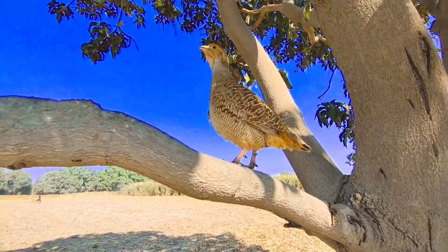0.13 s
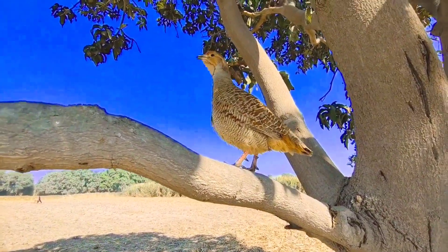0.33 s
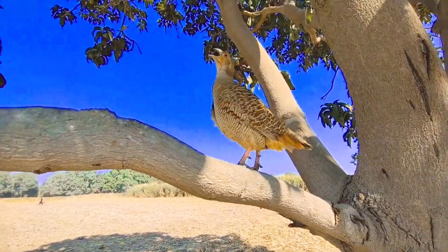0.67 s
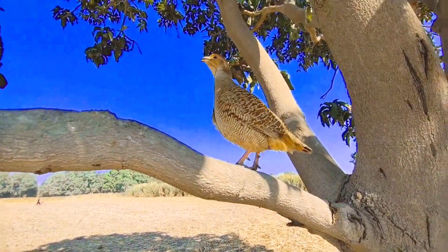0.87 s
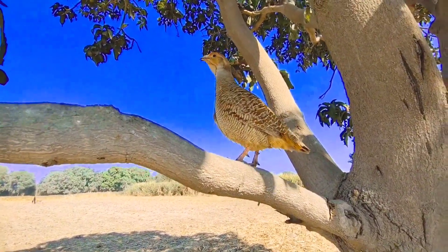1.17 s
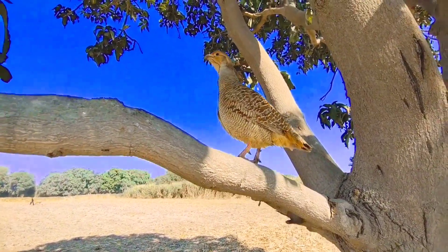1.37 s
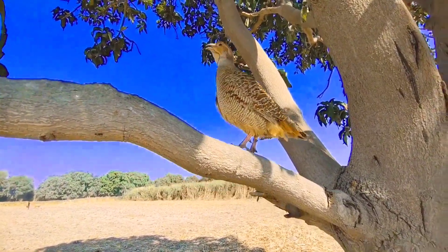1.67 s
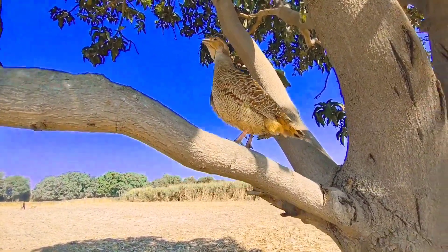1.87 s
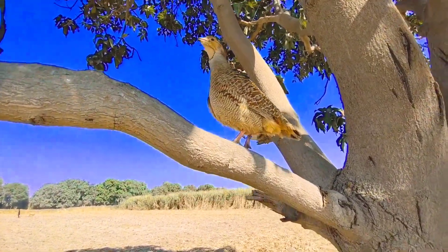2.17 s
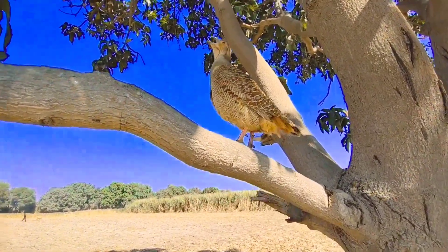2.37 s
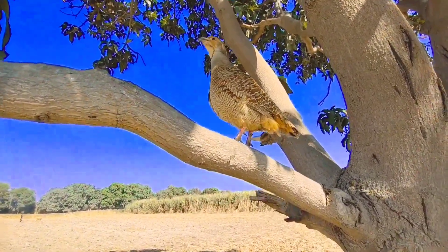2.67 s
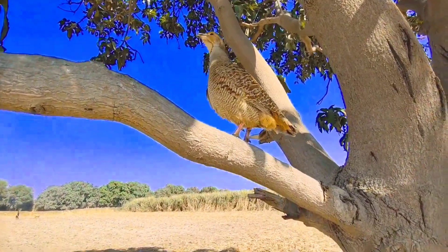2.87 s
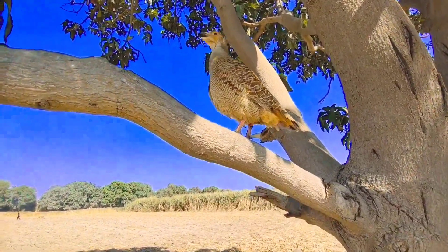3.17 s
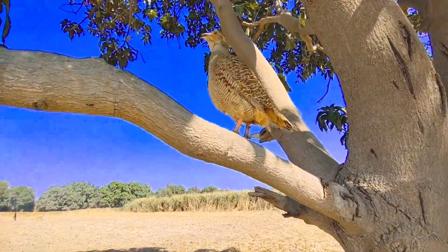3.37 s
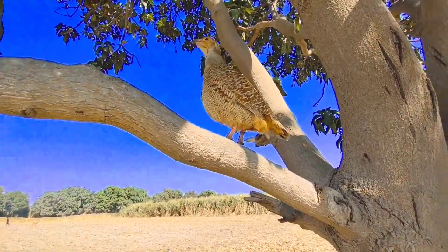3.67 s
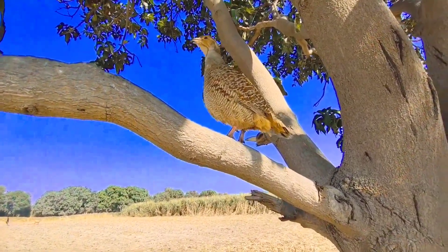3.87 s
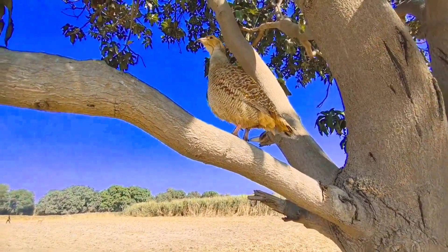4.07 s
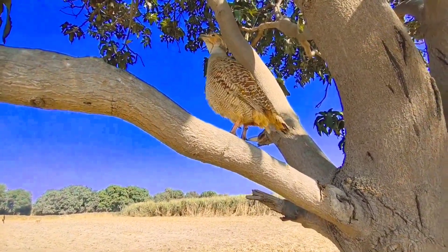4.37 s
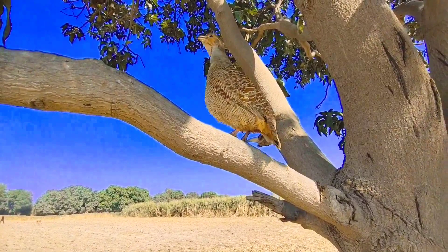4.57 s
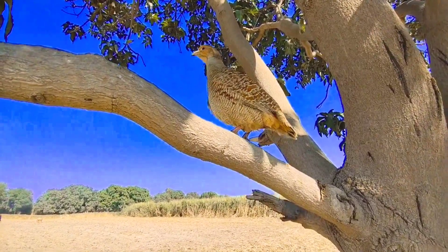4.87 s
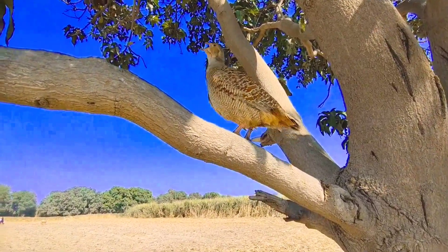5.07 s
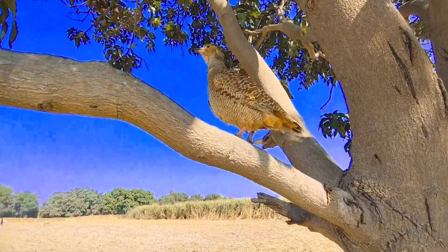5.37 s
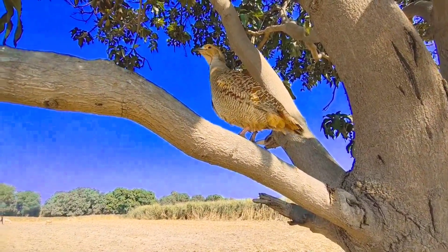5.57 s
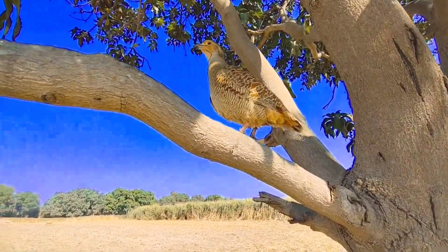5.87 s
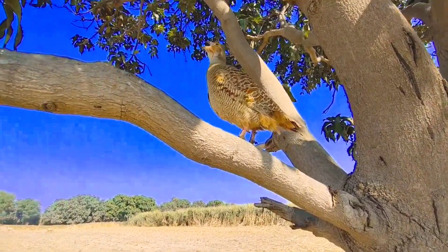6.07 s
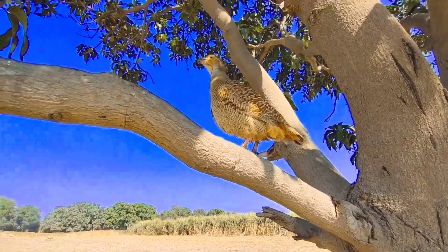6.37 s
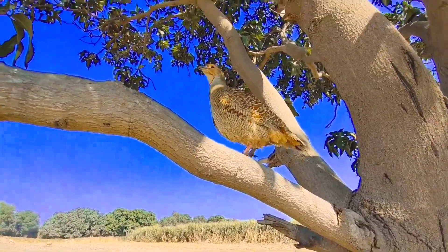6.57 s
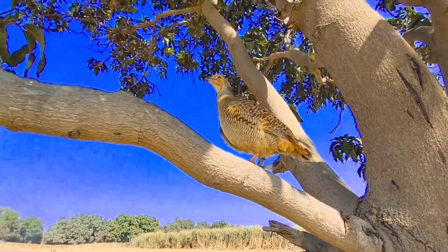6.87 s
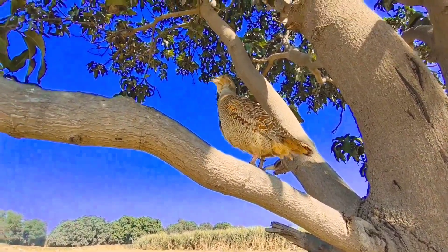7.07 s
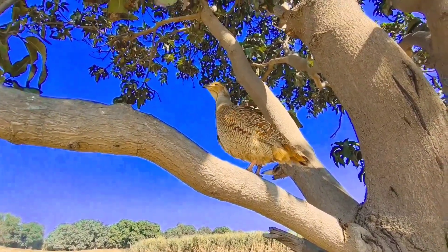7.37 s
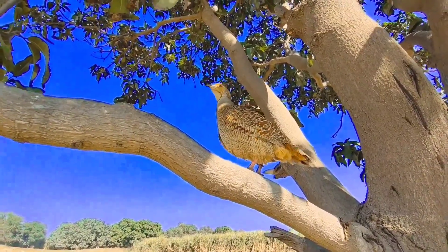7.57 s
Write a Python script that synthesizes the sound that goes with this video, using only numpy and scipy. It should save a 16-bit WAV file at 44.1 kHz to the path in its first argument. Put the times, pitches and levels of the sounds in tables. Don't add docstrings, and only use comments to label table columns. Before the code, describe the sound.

Close outdoor duet of two partridge-like birds in a tree. One gives a clean, piercing whistle that arches up and down; the other answers with three or four rapid raspy chucks falling in pitch, weaker toneless ones, then a short note leaping into a ringing, cracking cry over the whistle's end. The cycle repeats about nine times. Low wind thumps buffet the microphone, mostly on the right, with faint far leaf hiss.

```python
import sys
import numpy as np
from scipy import signal
from scipy.fft import rfft, irfft, next_fast_len
from scipy.io import wavfile
from scipy.ndimage import uniform_filter1d, map_coordinates

SR = 44100
rng = np.random.default_rng(int(sys.argv[2]) if len(sys.argv) > 2 else 0)


def level_to_linear(level):
    exponent = np.asarray(level, float) / 20
    return 10 ** exponent


def persist_wave(psi):
    counts = np.round(np.clip(psi, -1, 1) * 32767).astype(np.int16)
    wavfile.write(sys.argv[1], SR, np.atleast_2d(counts).T)


N = 340452
T = np.arange(N) / SR

# time [s], buffet level [dB].
WIND = [(0.0, -51), (0.06, -37.5), (0.56, -21), (0.6, -31), (1.53, -23.5), (1.57, -34.5), (2.13, -21.5),
        (2.51, -37), (2.6, -29), (3.63, -30.5), (4.41, -39.5), (4.47, -28), (4.94, -28.5), (5.25, -47),
        (5.37, -29), (6.71, -28), (6.79, -41), (7.72, -29.5)]
# frequency [Hz], density [dB per Hz].
RUMBLE = [(15, -59), (25, -37), (107, 0.5), (258, -6.5), (500, -18.5), (618, -27), (788, -34), (1140, -58),
          (1200, -67), (1560, -85.5), (2640, -120)]
# time [s], peak [dB].
PUFFS = [(0.106, -22.5), (0.372, -16), (0.469, -19), (0.534, -16), (0.694, -24), (0.913, -20),
         (0.979, -12.5), (1.334, -14.5), (1.436, -27), (1.5, -13.5), (1.969, -16), (2.609, -19), (2.7, -23),
         (3.214, -22.5), (3.47, -32), (3.573, -17.5), (3.919, -26), (4.031, -21.5), (4.152, -31),
         (4.472, -20.5), (4.657, -13), (4.669, -12), (4.725, -21), (4.884, -19), (6.264, -21),
         (6.339, -13.5), (6.441, -24), (7.188, -24)]
# frequency [Hz], density [dB per Hz].
FAR_LEAVES = [(200, -32), (600, -15), (1200, -6), (2500, -12.5), (3200, -12.5), (8000, -19.5), (15000, -31)]
# delay [ms], level [dB].
BRANCHES = [
    [(2.3, -30), (6.5, -19), (11, -19.5), (19, -25.5)],
    [(3.1, -17), (8.2, -15.5), (13, -18.5), (23, -33.5)],
]
# frequency [Hz], time to fall 60 dB [s].
TREE_DECAY = [(500, .2), (1800, .33), (2400, .32), (2800, .24), (5000, .2), (12000, .1)]

# multiple of the pitch, level [dB].
OVERTONES = [(3, -39), (4, -34), (5, -36), (6, -38)]

# start [s], start pitch [Hz], crest [s], crest pitch [Hz].
CLIMBS = [
    (-0.23, 2430, -0.115, 2690),
    (0.598, 2431, 0.709, 2690),
    (1.447, 1975, 1.587, 2560),
    (2.274, 2305, 2.394, 2637),
    (3.17, 2290, 3.279, 2548),
    (4.062, 1735, 4.207, 2590),
    (4.998, 2244, 5.099, 2560),
    (5.936, 2192, 6.058, 2550),
    (6.891, 2248, 6.985, 2569),
]
# end [s], end pitch [Hz], level [dB], second overtone [dB], haze [dB].
DESCENTS = [
    (0.012, 2340, -9, -30, -2),
    (0.838, 2371, -8, -27.5, -3.5),
    (1.706, 2338, -8, -21.5, -6),
    (2.525, 2261, -8, -21, -1.5),
    (3.38, 2387, -7.5, -21, 1.5),
    (4.32, 2294, -7.5, -22, 0.5),
    (5.236, 2131, -7, -19, -0.5),
    (6.135, 2345, -7.5, -20, 1.5),
    (7.085, 2390, -7, -18.5, 1.5),
]
# third overtone [dB], higher overtones [dB].
BRIGHT = [
    (4, -4),
    (12, -8),
    (-3, -3),
    (3, 0),
    (4, 2),
    (-3, 2),
    (3, 3),
    (2, 3),
    (3, 3),
]
# time from its start [s], level [dB].
SWELL = [(-.034, -34), (-.008, -14), (0.002, 1.2), (.04, 0.2)]
# time from the held note [s], level [dB].
YIELD = [(-.035, -0.4), (-.004, -2.2), (.006, -4.6)]
# time from its end [s], level [dB].
TIRE = [(.004, -6), (.017, -42)]
# frequency [Hz], density [dB per Hz].
WHISTLER_HAZE = [(300, -26), (1000, -5), (1500, -6), (2500, 3), (3500, 0), (4300, -2), (5000, -2),
                 (5900, -7), (8500, 0), (11500, -4), (14500, -1)]
# frequency [Hz], left minus right [dB].
LEAN = [(3000, -1.5), (10000, -1.2), (12500, 9), (15000, 11)]

# start [s], rasp [dB], tone [Hz], tone length [s], tone [dB].
OPENERS = [
    (0.176, -7, 2050, 0.031, -7),
    (1.011, -6, 2050, 0.034, -7),
    (1.872, -7.5, 2055, 0.035, -6.5),
    (2.705, -6, 2050, 0.034, -5),
    (3.583, -6.5, 2030, 0.031, -5.5),
    (4.541, -8.5, 2020, 0.027, -5),
    (5.413, -9, 1960, 0.028, -4),
    (6.361, -9.5, 1900, 0.021, -5.5),
    (7.298, -10, 1910, 0.021, -7.5),
]
# start [s], rasp [dB], tone [Hz], tone length [s], tone [dB].
FOLLOWERS = [(0.281, -11, 1910, 0.028, -7.5), (0.382, -11, 1760, 0.026, -11), (0.48, -12, 1580, 0.021, -9),
             (1.114, -10.5, 1960, 0.029, -7), (1.223, -9, 1860, 0.024, -8), (1.325, -11.5, 1720, 0.021, -9),
             (1.977, -10, 1984, 0.029, -7), (2.078, -10, 1870, 0.026, -9.5),
             (2.183, -9.5, 1740, 0.022, -12), (2.807, -10.5, 1950, 0.028, -5.5),
             (2.91, -11, 1850, 0.028, -9), (3.01, -9, 1900, 0.016, -7.5), (3.687, -9.5, 1870, 0.023, -9),
             (3.782, -11, 1760, 0.022, -11), (4.643, -9.5, 1880, 0.016, -12),
             (5.508, -14, 1770, 0.022, -12), (5.6, -11, 2010, 0.016, -8.5), (6.455, -11, 2000, 0.016, -9.5)]
# start [s], length [s], level [dB].
TRAILERS = [(0.565, 0.04, -14.5), (1.419, 0.039, -16.5), (2.281, 0.038, -18.5), (3.103, 0.051, -13),
            (3.211, 0.032, -28), (3.877, 0.039, -13), (3.969, 0.043, -19), (4.076, 0.039, -30),
            (4.731, 0.042, -12.5), (4.824, 0.045, -17.5), (4.913, 0.045, -18), (5.689, 0.045, -16),
            (5.774, 0.046, -21), (5.872, 0.05, -25), (6.544, 0.044, -15.5), (6.632, 0.045, -20),
            (6.732, 0.038, -23.5), (6.828, 0.045, -27), (7.39, 0.047, -12.5), (7.477, 0.041, -14.5),
            (7.571, 0.034, -20), (7.663, 0.068, -23)]
# held note start [s], length [s], pitch [Hz], level [dB], grunt [dB].
HELD = [
    (0.766, 0.029, 2260, -12, -35),
    (1.626, 0.024, 2760, -9, -32.5),
    (2.447, 0.031, 2256, -10, -36),
    (3.332, 0.023, 2800.0, -8.5, -33.5),
    (4.288, 0.033, 2240.0, -11, -32.5),
    (5.16, 0.034, 2253, -12, -35.5),
    (5.211, 0.034, 2240, -14, -50),
    (6.115, 0.031, 2250.0, -11.5, -31),
    (7.06, 0.033, 2250.0, -9.5, -30.5),
]
# start [s], time on top [s], top pitch [Hz], top level [dB], landing level [dB].
LEAPS = [
    (-0.025, 0.056, 2740, -10, -12),
    (0.811, 0.057, 2797, -10.5, -13),
    (1.67, 0.06, 2790, -9.5, -16),
    (2.493, 0.059, 2794, -9, -10.5),
    (3.376, 0.066, 2780, -8.5, -15),
    (4.338, 0.058, 2774, -9, -9),
    (5.238, 0.034, 2620, -19.5, -14),
    (6.163, 0.054, 2760, -9.5, -9),
    (7.116, 0.048, 2750, -12, -12.5),
]
# resonance [Hz], width [Hz], level [dB].
THROAT = [(580, 404, -22), (1280, 300, -1), (1650, 700, -1), (2250, 600, 3.5), (2883, 646, -3),
          (4000, 1020, -12)]
# resonance [Hz], width [Hz], level [dB].
SLACK_THROAT = [(620, 300, -16), (1000, 340, -4), (1350, 380, 4), (2030, 400, 4), (2900, 700, -6),
                (3900, 1000, -14)]
# resonance [Hz], width [Hz], level [dB].
OPEN_BEAK = [(1190, 168, 0.5), (2000, 158, 8.5), (3520, 590, 5.5), (4000, 770, 2)]
# frequency [Hz], density [dB per Hz].
RATTLER_HAZE = [(300, -21), (800, -6), (1300, -1.5), (2500, 1), (3800, -1), (5500, -9), (7500, -5),
                (10000, -9.5), (15000, -8)]
# centre [Hz], width [Hz], depth [dB].
SHADOWS = [
    [(1650, 110, -7), (2785, 300, -14), (3400, 600, -7), (5560, 300, -7)],
    [(1835, 120, -6), (2560, 120, -4), (5250, 250, -4)],
]
# time [s], share of shadow.
SHADED = [(4.5, .99), (6.2, .6), (7.0, .1)]
# frequency [Hz], extra level needed to sound [dB].
BAND_HANDICAP = [(900, 0), (1500, 6), (2000, 0), (4000, 0), (5900, 7), (7000, 0), (10500, 4), (15000, 2)]

WAVER_HZ, WHISTLE_LAG_MS, WHISTLE_PAN_DB = 7, .41, 2.5
LEAD_S, LEAD_DB = .03, -15
SAG_HZ_PER_S, STEADY_S, REST_HZ = 26000, .008, 1420
LOCK_S, STRONG_HZ, SLACK_HZ = .0215, 945, 660
OPENER_ONSET, FOLLOWER_ONSET = .22, .36
UNDER_DB, CLEARS_DB_PER_S = -5, 600
LANDING_HZ = 1760
TOP_HZ = 15550


def unit(x):
    return x / np.sqrt(np.mean(x ** 2) + 1e-20)


def wobble(rate):
    return map_coordinates(rng.standard_normal(int(N * rate / SR) + 4), [T * rate])


def filtered(x, response):
    m = next_fast_len(N + 8192)
    return irfft(rfft(x, m) * response(np.fft.rfftfreq(m, 1 / SR)), m)[..., :N]


def along(points, hz):
    f, v = np.transpose(points)
    return np.interp(np.log(hz + 1), np.log(f + 1), v)


def hiss(spectrum):
    return unit(filtered(rng.standard_normal((2, N)), lambda hz: level_to_linear(along(spectrum, hz))))


def far_leaves():
    return level_to_linear(-48 + .8 * wobble(3.324)) * hiss(FAR_LEAVES)


def wind():
    s, db = np.transpose(WIND)
    gusts = np.array([wobble(80), wobble(120)])
    eddies = rng.standard_normal((2, N)) * level_to_linear(5.34 * gusts)
    rumble = unit(filtered(eddies, lambda hz: level_to_linear(along(RUMBLE, hz))))
    buffet = rumble * level_to_linear(np.interp(T, s, db) + [[-12.5], [4]])
    for s, db in PUFFS:
        u = (T - s - .004) / 0.0016
        buffet[1] += level_to_linear(db + 8) * (1 - u * u) * np.exp(-u * u / 2)
    return buffet


def tree(x):
    hz, t, z = signal.stft(rng.standard_normal((2, SR // 2)), SR, nperseg=256)
    decay = level_to_linear(-60 * t / along(TREE_DECAY, hz)[:, None])
    tail = signal.istft(z * decay, SR, nperseg=256)[1]
    answer = level_to_linear(-24.5) * np.pad(tail / np.linalg.norm(tail[0]), ((0, 0), (400, 0)))
    for port, echoes in enumerate(BRANCHES):
        for ms, db in echoes:
            answer[port, round(ms * SR / 1000)] += level_to_linear(db)
    return signal.fftconvolve(x, answer, axes=1)[:, :N]


def shade(x):
    def dip(f, centre, width, db):
        return 1 - (1 - level_to_linear(db)) * 1j * f * width / (centre * centre - f * f + 1j * f * width)

    def dips(f):
        return [np.prod([dip(f, *row) for row in port], axis=0) for port in SHADOWS]

    share = np.clip(np.interp(T, *np.transpose(SHADED)), 0, 1)
    return share * filtered(x, dips) + (1 - share) * x


def linger(power, rise_s, fall_s):
    t = np.arange(SR // 4) / SR
    shape = np.exp(-t / fall_s) - np.exp(-t / rise_s)
    return np.abs(signal.fftconvolve(power, shape[None] / shape.sum(), axes=1))[:, :N]


def swelling_noise(voice, spectrum, level_db, fall_s, growth):
    _, _, z = signal.stft(hiss(spectrum), nperseg=512)
    field = uniform_filter1d(rng.standard_normal(z.shape[1:]), size=10, axis=0)
    field = uniform_filter1d(field, size=5, axis=1)
    patchy = unit(signal.istft(z * level_to_linear(3 * unit(field)), nperseg=512)[1][:, :N])
    return level_to_linear(level_db) * linger(voice ** 2, rise_s=3 / 1000, fall_s=fall_s) ** growth * patchy


def whistler_haze(arches):
    ends, *_, haze_db = np.transpose(DESCENTS)
    lead = level_to_linear(LEAD_DB) * np.roll(arches, -int(LEAD_S * SR), axis=1)
    noise = swelling_noise(arches + lead, WHISTLER_HAZE, level_db=-22, fall_s=0.014, growth=0.35)
    noise = filtered(noise, lambda hz: level_to_linear(along(LEAN, hz) * [[.3], [-.7]]))
    return level_to_linear(np.interp(T, ends - .1, haze_db)) * noise


def rattler_haze(rattle):
    return swelling_noise(rattle, RATTLER_HAZE, level_db=-18, fall_s=0.0045, growth=0.48)


def add_note(mix, rows, lag_ms, pan_db, second_db, upper_db, smooth_s, third_db=0, thin=.55):
    s, hz, db = np.transpose(rows)
    span = slice(max(int(s[0] * SR), 0), max(int(s[-1] * SR), 1))
    t = T[span]
    pitch = uniform_filter1d(np.interp(t, s, hz), int(smooth_s * SR) + 1)
    cycles = np.cumsum(pitch) / SR - pitch * np.array([[lag_ms / 1000], [0]])
    level = np.interp(t, s, db)
    weak_db = thin * (level - db.max())
    partials = [(1, 0), (2, second_db)]
    partials += [(k, g + upper_db + (k == 3) * third_db) for k, g in OVERTONES]
    wave = 0
    for k, g in partials:
        drift = np.interp(t, np.linspace(s[0], s[-1], num=7), rng.normal(0, 1.9, size=7))
        fade = min(k - 1, 2) / 2 * drift
        wave = wave + level_to_linear(g + fade + (k > 1) * weak_db) * np.sin(2 * np.pi * k * cycles)
    mix[:, span] += np.sqrt(2) * level_to_linear(level + [[pan_db / 2], [-pan_db / 2]]) * wave


def whistler():
    mix = np.zeros((2, N))
    for climb, descent, (third_db, upper_db) in zip(CLIMBS, DESCENTS, BRIGHT):
        start, start_hz, crest, crest_hz = climb
        end, end_hz, db, second_db, _ = descent
        entry = min([end - .02] + [row[0] for row in HELD if row[0] > crest])
        shape = np.vstack([np.add(SWELL, [start, db]), np.add(YIELD, [entry, db]), np.add(TIRE, [end, db])])
        s = np.linspace(shape[0, 0], shape[-1, 0], num=150)
        rise = (crest_hz - start_hz) / (crest - start) ** 2
        fall = (crest_hz - end_hz) / (end - crest) ** 2
        arch = crest_hz - np.where(s < crest, rise, fall) * (s - crest) ** 2
        waver = WAVER_HZ * np.interp(s, s[::15], rng.standard_normal(size=10))
        rows = np.transpose([s, arch + waver, np.interp(s, *shape.T)])
        add_note(mix, rows, WHISTLE_LAG_MS, WHISTLE_PAN_DB, second_db, upper_db, smooth_s=0.012,
                 third_db=third_db, thin=.4)
    return mix * level_to_linear(0.45 * wobble(47))


def rasp(bursts, tract, jitter, noise, onset=.4, swell_s=.02):
    effort, pitch = np.zeros(N), np.full(N, 500.)
    for s, length, db, hz in bursts:
        span = slice(max(int(s * SR), 0), max(int((s + length + .01) * SR), 1))
        t = T[span] - s
        peak = min(length, swell_s)
        knots = [0, onset * peak, .9 * peak, max(length - .018, peak), length + .01]
        effort[span] += level_to_linear(db + np.interp(t, knots, [-26, -10, 0, -2, -26]))
        glide = np.interp(t, [0, .018, .05], [.8 * min(hz, 600), hz, .84 * hz])
        pitch[span] = glide * (1 + .05 * rng.standard_normal())
    unsteady = 1 + jitter * pitch / 600 * wobble(700)
    cycles = np.cumsum(pitch * unsteady) / SR
    slaps = np.diff(np.floor(cycles), prepend=0) * level_to_linear(1.8 * rng.standard_normal(N))
    leak = np.clip(noise * pitch / 700, 0, 1)
    source = (1 - leak) * unit(slaps) + leak * rng.standard_normal(N)

    def throat(f):
        modes = sum((-1) ** k * level_to_linear(db) * 1j * f * w / (c * c - f * f + 1j * f * w)
                    for k, (c, w, db) in enumerate(tract))
        return modes / (1 + 1j * f / 3000)

    voice = effort * unit(filtered(source, throat))
    return np.array([level_to_linear(4.0) * np.roll(voice, 15), level_to_linear(2.5) * voice])


def chucks():
    mix, bursts = np.zeros((2, N)), []
    for s, rasp_db, hz, length, db in list(OPENERS) + list(FOLLOWERS):
        end_hz = max(hz - SAG_HZ_PER_S * (length - STEADY_S), REST_HZ)
        wait = min(LOCK_S, length)
        rows = [(-.005, .96 * hz, db - 18), (.001, hz, db - 4), (STEADY_S, .98 * hz, db),
                (.45 * length, .7 * hz + .3 * end_hz, db + 3),
                (.8 * length, .27 * hz + .73 * end_hz, db - 1),
                (length - .002, end_hz, db - 9), (length + .005, .97 * end_hz, db - 26)]
        add_note(mix, np.add(rows, [s + wait, 0, 0]), lag_ms=.345, pan_db=1.2, second_db=-20.5,
                 upper_db=-18, smooth_s=.003)
        under_db = db + UNDER_DB - CLEARS_DB_PER_S * (length - .016)
        bursts += [(s, wait - .004, rasp_db - 3.5, STRONG_HZ), (s + wait - .003, length + .012, under_db, 780)]
    split = 2 * len(OPENERS)
    slack = [(s - .002, length, db, SLACK_HZ) for s, length, db in TRAILERS]
    tones = mix * level_to_linear(1.2 * wobble(140))
    opening = rasp(bursts[:split], THROAT, jitter=.1, noise=.45, onset=OPENER_ONSET)
    following = rasp(bursts[split:], THROAT, jitter=.1, noise=.45, onset=FOLLOWER_ONSET)
    trailing = rasp(slack, SLACK_THROAT, jitter=.07, noise=.42, onset=.45, swell_s=.024)
    return tones + opening + following + trailing


def held_notes():
    mix, hoarse = np.zeros((2, N)), []
    for s, length, hz, db, grunt_db in HELD:
        hoarse += [(s - .038, .036, db - 10.5, 1000), (s + length - .008, .022, db - 24, 1050)]
        note = [(-.004, .95 * hz, db - 20), (.002, 1.01 * hz, db + 1), (length - .008, .98 * hz, db),
                (length - .003, .96 * hz, db - 4), (length + .004, 2050, db - 24)]
        add_note(mix, np.add(note, [s, 0, 0]), lag_ms=0.356, pan_db=1, second_db=-15.5, upper_db=2,
                 smooth_s=.002, third_db=8)
        pip = [(-.034, 2020, -16), (-.03, 1960, 0), (-.026, 1840, -1), (-.022, 1700, -16)]
        add_note(mix, np.add(pip, [s, 0, grunt_db + 13]), lag_ms=.35, pan_db=-2, second_db=-4, upper_db=3,
                 smooth_s=.002)
        grunt = [(0, 1200, grunt_db - 18.5), (.005, 1050, grunt_db), (.014, 1080, grunt_db),
                 (.021, 1130, grunt_db - 3)]
        for start, loud_db, third_db in ((s - .022, 6, 14), (s + length - .002, 2.5, 4)):
            add_note(mix, np.add(grunt, [start, 0, loud_db]), lag_ms=0.285, pan_db=-4, second_db=-1.5,
                     upper_db=25, smooth_s=.003, third_db=third_db)
    return mix + rasp(hoarse, OPEN_BEAK, jitter=.08, noise=0.73)


def leaps():
    flight, ends, low_hz = np.zeros((2, N)), [], LANDING_HZ
    for s, top, hz, db, low_db in LEAPS:
        leap = [(-.008, .82 * hz, db - 22), (0, .86 * hz, db - 11), (.003, .99 * hz, db + 1.5),
                (.2 * top, hz, db + 2.5), (.4 * top, .985 * hz, db + 1.5), (.58 * top, .95 * hz, db - 5),
                (.72 * top, .92 * hz, db - 14), (.9 * top, .86 * hz, db - 11), (top, .78 * hz, db - 24)]
        add_note(flight, np.add(leap, [s, 0, 0]), lag_ms=0.391, pan_db=-1, second_db=-15.5, upper_db=3,
                 smooth_s=0.0032, third_db=9, thin=.45)
        landing = [(-.004, 1.14 * low_hz, -18), (.002, 1.03 * low_hz, -1), (.006, low_hz, 0),
                   (.012, .94 * low_hz, -3), (.015, .96 * low_hz, -14), (.019, 1.03 * low_hz, -7),
                   (.024, .96 * low_hz, -13), (.036, .99 * low_hz, -26)]
        add_note(flight, np.add(landing, [s + top, 0, low_db]), lag_ms=.37, pan_db=1.5, second_db=-24,
                 upper_db=3, smooth_s=.002)
        ends.append((s + top + .008, .02, low_db - 16, 850))
    cracked = flight * level_to_linear(1.7 * wobble(200))
    return cracked + rasp(ends, THROAT, jitter=0.046, noise=0.24)


def scene():
    arches = whistler()
    rattle = shade(chucks() + held_notes() + leaps())
    noise = whistler_haze(arches) + rattler_haze(rattle)
    echoes = tree(level_to_linear(-3) * arches + rattle)
    return far_leaves() + wind() + echoes + noise + arches + rattle


def hush_faint_bands(x, reach_db, chance_db):
    hz, _, z = signal.stft(x, SR, nperseg=1024)
    level = 10 * np.log10(uniform_filter1d(np.abs(z) ** 2, size=9, axis=1) + 1e-14)
    band = (14 * np.log(1 + hz / 1500)).astype(int)
    luck = uniform_filter1d(rng.standard_normal((band[-1] + 1, z.shape[2])), size=6, axis=1)
    luck = unit(luck)[band]
    below_db = level - level.max(1, keepdims=True)
    margin = below_db + reach_db + chance_db * luck - along(BAND_HANDICAP, hz)[:, None]
    keep = np.clip(margin / 3, .03, 1) * (hz < TOP_HZ)[:, None]
    return signal.istft(z * keep, SR, nperseg=1024)[1][:, :N]


def low_pass(x):
    return signal.sosfilt(signal.butter(12, 16400, fs=SR, output="sos"), x)


def record(dry):
    held = dry / (1 + np.abs(dry / 0.88) ** 6) ** (1 / 6)
    mix = hush_faint_bands(held, reach_db=49.5, chance_db=7.5)
    return low_pass(mix)


dry = scene()
out = record(dry)
persist_wave(out)
```